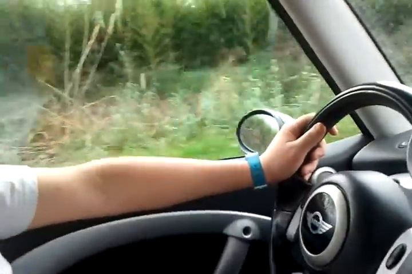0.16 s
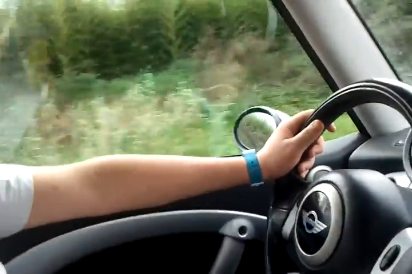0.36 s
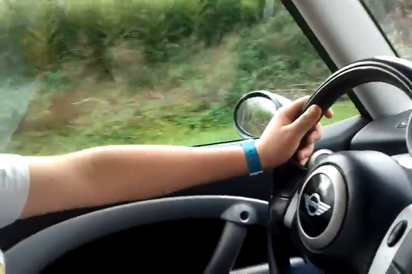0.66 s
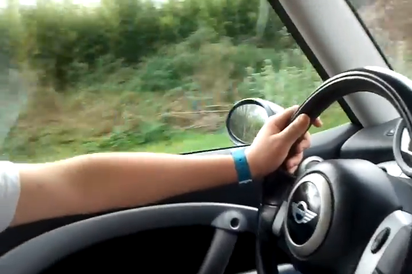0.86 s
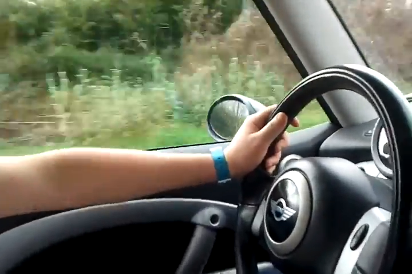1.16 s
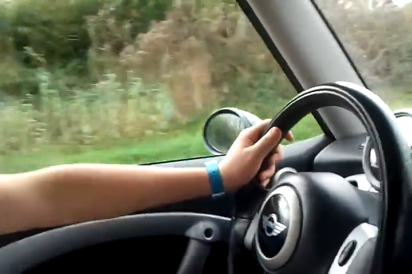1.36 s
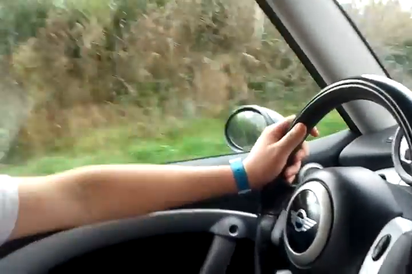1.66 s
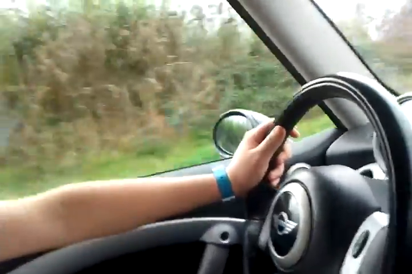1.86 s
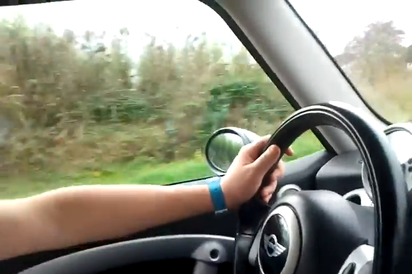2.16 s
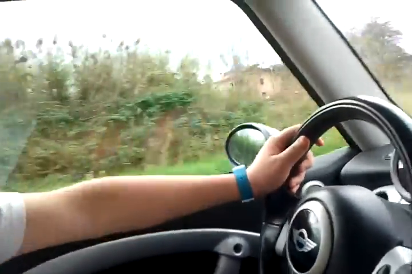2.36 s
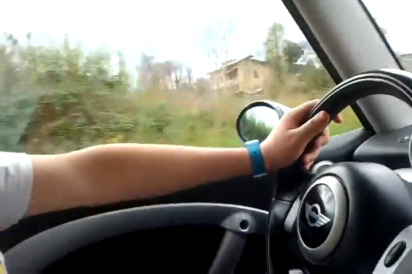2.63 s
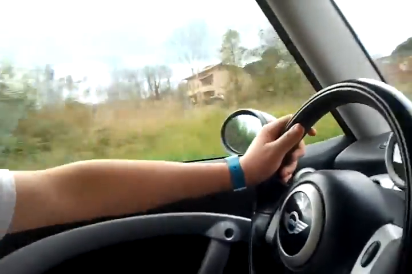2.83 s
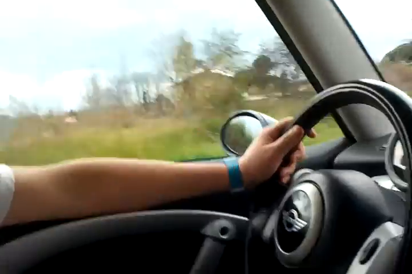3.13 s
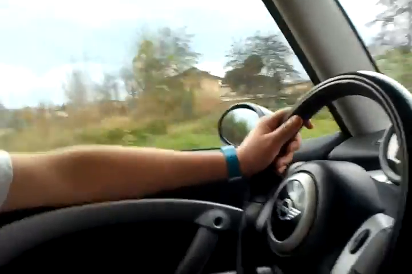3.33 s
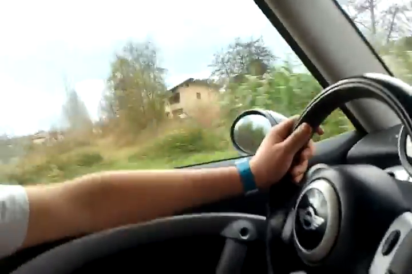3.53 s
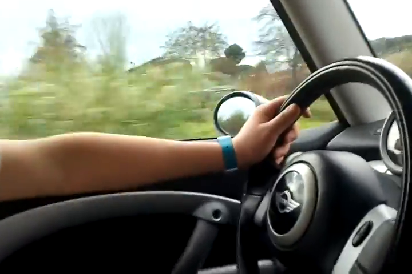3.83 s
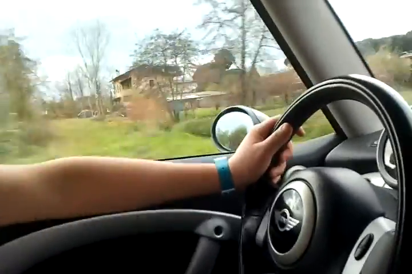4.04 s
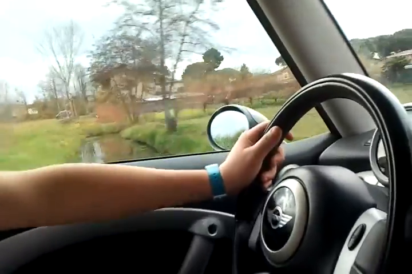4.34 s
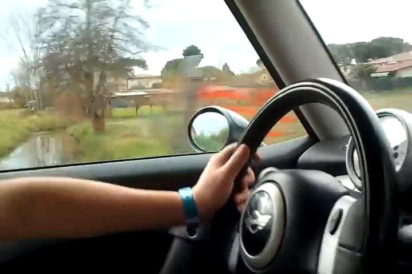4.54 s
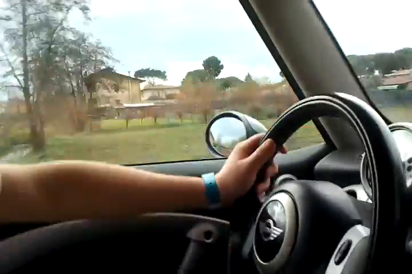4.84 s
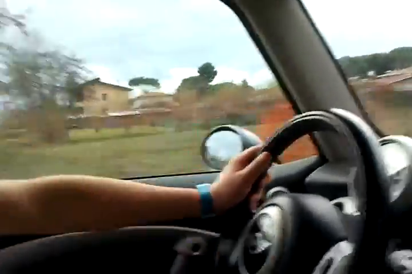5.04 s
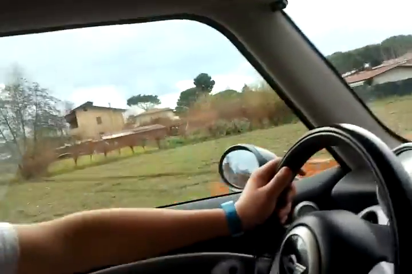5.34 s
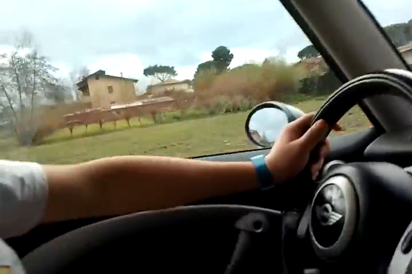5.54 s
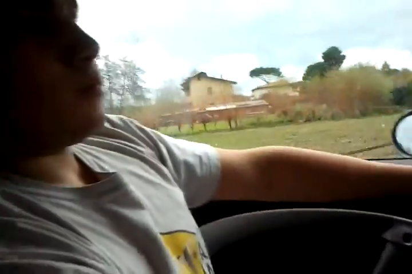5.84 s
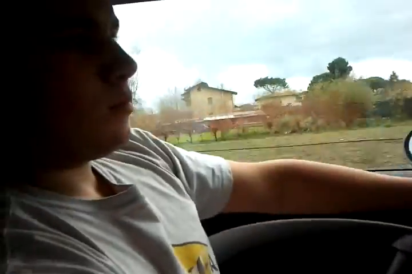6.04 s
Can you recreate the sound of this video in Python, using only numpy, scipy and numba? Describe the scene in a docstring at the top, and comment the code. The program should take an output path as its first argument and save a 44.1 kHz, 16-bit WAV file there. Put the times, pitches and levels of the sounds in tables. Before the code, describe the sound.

Inside a small car on a country lane, a deep, uneven road rumble runs throughout, with a low engine hum and tyre roar underneath. Bumps bring dull suspension thuds and short rattles, clicks and tiny squeaks from loose plastic trim. They cluster around two seconds and just after three, then hit hardest near five seconds, briefly overloading the hand-held phone microphone.

```python
"""A deep, lurching rumble inside a small car on a country lane, heard through a hand-held phone.
The road shakes the body, cabin air and panels; bumps set off low swings and suspension thuds.
A four-cylinder engine hums underneath, the tyres roar, and loose trim buzzes, knocks and squeaks
on the rough patches. Far back sit a faint drivetrain whine, wind and, near the end, a thin tone.
The phone overloads on the biggest bumps."""
import sys
import numpy as np
from scipy import signal
from scipy.io import wavfile
from scipy.ndimage import uniform_filter1d
from numba import njit

SR = 44100
rng = np.random.default_rng(int(sys.argv[2]) if len(sys.argv) > 2 else 0)


def transcribe(signal):
    """Save signal, clipped to [-1, 1], as a 16-bit WAV file at the path in sys.argv[1]."""
    frames = np.atleast_2d(signal).T
    limited = np.clip(frames, -1, 1)
    pcm = np.round(limited * 32767).astype(np.int16)
    wavfile.write(sys.argv[1], SR, pcm)


N = 272979

# Resonances of the body, cabin air and panels: pitch_hz, nominal_width_hz, relative_db
BODY_MODES = [(12.2, 9.9, -5.5), (21.39, 6.45, -2.5), (33.7, 20, -8)]
CABIN_MODES = [(56.56, 5.57, 0.94), (73.42, 7.8, -2.5)]
PANEL_MODES = [(97.5, 32.5, 5), (120.56, 29, 3), (164.4, 22, -18), (184.6, 14, -10.5), (221.9, 24, -8),
               (254.6, 6.8, -21.5)]
# Fader moves for the body boom and cabin drone: time_s, boom_db, drone_db
SHELL_LEVELS = [(0, -5, -25), (.35, -31.5, -18), (.66, -19.5, -25.5), (1.0, -9, -11), (1.2, -11, -16.5),
                (1.35, -14, -15.5), (1.47, -10, -9), (1.66, -16.5, -21.5), (1.91, -6.5, -22),
                (2.05, -10.5, -10.5), (2.3, -13.5, -19), (2.8, -28.5, -13.5), (3.03, -27.5, -19.5),
                (3.3, -13.5, -18.5), (3.5, -10, -7.5), (3.8, -19, -20), (4.16, -23.5, -11.5),
                (4.5, -17, -22.5), (4.75, -25, -6), (4.88, -12.5, -16.5), (5.13, -12.5, 1.5),
                (5.25, -11, -11), (5.5, -22.5, -17), (5.66, -9.5, -16), (5.9, -20.5, -19), (6.19, -10, -13)]
# Roughness of the tarmac, heard in the panels and trim: time_s, thrum_db, buzz_db
ROAD_LEVELS = [(0, -20.5, -50), (.45, -24.5, -58.5), (1.03, -16.5, -53.5), (1.16, -23, -53.5),
               (1.25, -13.5, -59.5), (1.36, -15.5, -54.5), (1.6, -16, -51.5), (1.78, -9, -44.5),
               (1.9, -13, -49.5), (2.03, -10, -44.5), (2.14, -24, -46.5), (2.21, -9.5, -50.5),
               (2.28, -23, -52), (2.4, -24.5, -52), (3.03, -18.5, -57.5), (3.28, -13.5, -49.5),
               (3.35, -20, -42.5), (3.41, -12.5, -51.5), (3.48, -17, -48), (3.72, -27, -56),
               (4.1, -22.5, -53), (4.53, -23.5, -62), (4.78, -10.5, -55), (4.94, -11, -37.5),
               (5.01, -4.5, -47), (5.07, -4, -64), (5.125, -1, -55), (5.17, -9, -61), (5.24, -13, -51),
               (5.32, -14, -65), (5.4, -22, -84), (6.05, -22, -81), (6.19, -28, -50)]
def road_rumble(t, road):
    """One road force makes the body boom, the cabin air drone and the panels thrum."""
    boom = undb(curve(t, SHELL_LEVELS)) * shaken(BODY_MODES, road, flicker_db=.72, per_s=4.15)
    drone = undb(curve(t, SHELL_LEVELS, 2)) * shaken(CABIN_MODES, road, flicker_db=.95, per_s=4.52)
    thrum = undb(curve(t, ROAD_LEVELS)) * shaken(PANEL_MODES, road, flicker_db=1.68, per_s=7.5)
    return boom + drone + thrum


# Low swings after bumps: start_s, peak_db, pitch_hz, swing_count
BUMP_SWINGS = [(1.568, 2, 20.6, 2.1), (1.682, -3, 22, 1.1), (1.781, 2, 28, 2.1), (1.860, -2, 24, 1.1),
               (1.983, -4, 60, 8), (3.300, -5, 14, 2.9), (3.497, -2, 24, 1.1), (5.007, 5, 21, 2.4),
               (5.099, 4, 44, 1.1), (5.151, 1, 45, 1.1), (5.192, 4, 20, 2.2), (5.290, -4, 20, 2.1)]
def bump_swings(t):
    """Bumps leave deep heaves, short shudders and one brief 60 Hz cabin ring; fast in, slower out."""
    out = 0
    for start, db, hz, swings in BUMP_SWINGS:
        progress = np.clip((t - start) * hz / swings, 0, 1)
        swell = np.abs(np.sin(np.pi * progress ** .65)) ** .6
        out += undb(db) * swell * np.sin(2 * np.pi * hz * (t - start))
    return out


# Suspension hits: start_s, level_db, pitch_hz, t60_s
FLOOR_THUDS = [(0.789, -14, 200, 0.091), (1.228, -13, 214, 0.096), (1.4, -22, 189, 0.092),
               (1.461, -17.5, 218, 0.09), (1.659, -21, 169, 0.11), (1.776, -13.5, 229, 0.11),
               (2.004, -8.5, 259, 0.066), (2.201, -12.5, 181, .06), (2.461, -8, 138, 0.11),
               (3.1, -8.5, 140, .1), (3.258, -14, 264, 0.044), (3.384, -16, 400, 0.037),
               (3.411, -13, 327, .05), (3.498, -25, 150, .08), (3.952, -14, 150, 0.1),
               (4.127, -10, 128, 0.14), (4.389, -11.5, 140, .08), (4.773, -15.5, 198, 0.097),
               (4.834, -17, 188, 0.068), (4.926, -14, 332, 0.14), (5.006, -1.5, 383, 0.022),
               (5.073, -10.5, 198, 0.073), (5.13, -8, 447, 0.07), (5.3194, -2.5, 282, 0.02),
               (5.7, -26, 148, 0.1)]
def suspension_thuds(t, attack_s=.00074):
    """The suspension rings the floor pan: a dull note with a hard attack and a short tail."""
    out = 0
    for start, db, hz, t60 in FLOOR_THUDS:
        age = np.maximum(t - start, 0)
        envelope = undb(db - 60 * age / t60) * (1 - np.exp(-age / attack_s))
        out -= envelope * np.sin(2 * np.pi * hz * age)
    return out


# Partials of the engine hum: firing_rate_multiple, relative_db
ENGINE_PARTIALS = [(.5, -0.5), (1, -3.5), (1.5, -6.5), (2, -12), (3, -21.5), (4, -29)]
# Engine fader: time_s, level_db
ENGINE_FADER = [(0, -18.5), (2, -16), (4.5, -23), (6.19, -25.5)]
def engine_hum(t, firing_hz=60.23, sag_hz_per_s=.4):
    """Firing orders of a smooth four, sinking slowly, each wavering with the mounts."""
    hz = (firing_hz - sag_hz_per_s * t) * (1 + .01079 * walk(6.5))
    phase = 2 * np.pi * np.cumsum(hz) / SR
    hum = sum(undb(db + .86 * walk(2.5)) * np.sin(order * phase + 2 * np.pi * rng.random())
              for order, db in ENGINE_PARTIALS)
    return undb(curve(t, ENGINE_FADER)) * unit(hum)


# Colour of the tyre roar: pitch_hz, nominal_width_hz, relative_db
TYRE_BANDS = [(347.3, 73, 4), (474, 263, 1), (583, 180, -2.5), (691, 160, -2), (794, 110, -7),
              (947, 110, -11), (1134, 216, -9.5), (1325, 630, -12.5), (1700, 10000, -47)]
# Broken patches of tarmac: middle_s, peak_db, half_length_s
ROUGH_PATCHES = [(1.007, -42, 0.11), (1.271, -40, 0.11), (1.476, -33, 0.071), (1.801, -31, 0.12),
                 (2.025, -28.5, 0.12), (2.208, -30.5, 0.023), (3.21, -32, 0.033), (3.404, -29.5, 0.059),
                 (3.483, -37.5, 0.091), (4.787, -45, 0.15), (4.974, -25, 0.083), (5.15, -22, 0.065),
                 (5.321, -31.5, 0.014)]
def tyre_roar(t, tread, smooth_road_db=-37):
    """The tread roars on smooth tarmac and swells over each broken patch."""
    swells = sum(undb(db) * np.exp(-((t - middle) / half) ** 2) for middle, db, half in ROUGH_PATCHES)
    level = np.hypot(undb(smooth_road_db), swells) * undb(.26 * walk(25.07))
    return level * shaken(TYRE_BANDS, tread, flicker_db=1.47, per_s=12, shift_samples=SR // 3)


# Air resonances in the tyres and floor: pitch_hz, nominal_width_hz, relative_db
CAVITY_MODES = [(242, 30, -0.5), (324.4, 45, -2)]
# Cavity fader: time_s, level_db
CAVITY_FADER = [(0, -35), (.7, -34), (1.3, -33.5), (2.3, -42), (2.9, -37.5), (3.7, -42.5), (4.5, -43),
                (5.5, -45), (6.19, -37.5)]
def cavity_ring(t, air):
    """Air in the tyres and floor rings with a hollow note."""
    return undb(curve(t, CAVITY_FADER)) * shaken(CAVITY_MODES, air, flicker_db=1.7, per_s=6.6)


# Trim rattles: start_s, level_db, centre_hz, nominal_width_ratio, length_s, thump_db
RATTLES = [(0.838, -47.5, 2270, 0.71, 0.017, -36), (0.997, -50.5, 1600, 1.2, 0.073, -32),
           (1.07, -46, 1400, 0.34, 0.01, -30), (1.081, -49, 2580, 0.56, 0.01, -31),
           (1.232, -57, 1290, 0.46, 0.0093, -25), (1.27, -54, 1290, 0.48, 0.011, -34),
           (1.522, -33.5, 2600, 0.74, 0.0087, -41), (1.537, -43, 2350, 1.5, 0.018, -33),
           (1.564, -50, 2500, 1.1, 0.014, -36), (1.644, -39, 1980, 1.3, 0.025, -31),
           (1.675, -50, 1940, 1.7, 0.044, -13.5), (1.745, -44.5, 2500, 1.8, 0.015, -34),
           (1.771, -42, 1870, 1.1, 0.016, -23), (1.813, -41, 2500, 0.84, 0.0064, -28),
           (1.849, -39, 2530, 1.4, 0.015, -35), (1.909, -39.5, 2480, 0.97, 0.044, -36),
           (1.982, -28, 1860, 2.2, 0.0089, -7.5), (2.191, -40.5, 1600, 1.7, 0.014, -17.5),
           (2.234, -46, 1500, 1.4, 0.011, -14.5), (2.392, -55, 4360, 0.28, 0.024, -39),
           (2.512, -65, 1630, 0.67, 0.017, -16.5), (3.123, -70, 1910, 0.92, 0.0098, -16),
           (3.181, -42, 3740, 0.74, 0.011, -14), (3.216, -45.5, 1550, 0.75, 0.037, -20),
           (3.303, -54, 3000, 0.76, 0.008, -43), (3.312, -43, 6000, 1.5, 0.002, -42),
           (3.3174, -38.5, 3760, 3.9, 0.0091, -25), (3.342, -32.5, 4300, 2, 0.004, -36),
           (3.345, -37.5, 4300, 1.1, 0.022, -58), (3.412, -48, 1950, 0.67, 0.0076, -13.5),
           (3.434, -54, 4000, 1.5, 0.005, -36), (3.448, -45, 2940, 0.81, 0.013, -20),
           (3.853, -42.5, 2400, 0.75, 0.018, -34), (3.8827, -33.5, 3300, 1.6, 0.018, -17),
           (3.987, -39, 4200, 1.6, 0.012, -29), (4.176, -44, 1640, 0.66, 0.011, -34),
           (4.675, -69, 1686, 1.5, 0.037, -15.5), (4.778, -53, 1370, 0.55, 0.045, -14),
           (4.821, -41, 2300, 1.8, 0.012, -50), (4.855, -46, 3000, 1.5, 0.008, -32),
           (4.876, -38, 1730, 1.6, 0.037, -27), (4.92, -44, 1650, 1.1, 0.053, -35),
           (4.9439, -21.5, 3500, 0.95, 0.0021, -19), (4.946, -26.5, 3130, 1.8, 0.015, -9),
           (4.978, -34, 2980, 2, 0.0035, -37), (4.989, -31.5, 2590, 2.4, 0.0092, -30),
           (5.005, -35.5, 1920, 1.7, 0.022, -23), (5.048, -38.5, 2500, 1.8, 0.016, -36),
           (5.114, -49, 3000, 2, 0.0034, -27), (5.12, -38, 1440, 1.2, 0.031, -12),
           (5.218, -46, 1800, 0.8, 0.014, -9), (5.239, -36, 4500, 1.4, 0.019, -32),
           (5.262, -56, 2010, 1.3, 0.008, -39), (5.279, -38, 3500, 2, 0.004, -30),
           (5.289, -38.5, 3500, 2.8, 0.0086, -15.5), (5.299, -33.5, 3220, 2, 0.011, -35),
           (5.319, -30, 2800, 0.49, 0.0046, -4), (5.383, -39.5, 1580, 1.06, 0.018, -30),
           (6.0885, -36.5, 2480, 1.3, 0.0096, -0.5), (6.096, -32, 3000, 2.8, 0.0081, -30)]
def trim_knocks(hollow_hz=1400, crack_hz=810, thump_floor_hz=22.8, sag_hz=161.5, sag_s=.005):
    """Each jolt makes a panel chatter against its clip for a moment, over a dull crack and thump."""
    age = np.arange(SR // 8) / SR
    out = np.zeros(N + len(age))
    bounces = np.pad(undb(1.5 * walk(350)), (0, len(age)), mode="reflect")  # uneven rebounds
    # The thump pushes inward first and sags in pitch as the panel relaxes.
    cycles = thump_floor_hz * age + sag_hz * sag_s * (1 - np.exp(-age / sag_s))
    thump = -np.sin(2 * np.pi * cycles) * undb(-60 * age / .1)  # 60 dB down in 0.1 s
    attack = np.minimum(age / .0005, 1)
    first_contact = 1 + undb(-2) * np.exp(-age / .0014)
    tail = .06 * np.exp(-age / .03)
    for start, db, hz, width_ratio, length, thump_db in RATTLES:
        grit = rng.standard_normal(len(age))
        span = slice(int(start * SR), int(start * SR) + len(age))
        hold = np.exp(-(age / length) ** 4)
        envelope = attack * (hold + tail) * first_contact * bounces[span]
        ring = unit(resonance(grit, hz, width_ratio * hz) + .16 * grit)
        hollow = undb(-4) * unit(resonance(grit, hollow_hz, .79 * hollow_hz))  # space behind the trim
        crack = undb(-23.5) * unit(bandpass(grit, crack_hz, .32 * crack_hz))
        out[span] += undb(db) * envelope * (ring + hollow) + undb(thump_db) * (envelope * crack + thump)
    return out[:N]


# Colour of the trim buzz: pitch_hz, nominal_width_hz, relative_db
BUZZ_BANDS = [(1410, 810, 0.5), (2370, 3330, 17.5), (4650, 13000, -4.5), (6800, 7400, 0)]
def trim_buzz(t, grit, hits_per_s=240, spread_db=2.1, t60_s=.036):
    """Many tiny trim contacts, a few much harder than the rest, blur into a buzz on rough tarmac."""
    hits = (rng.random(N) < hits_per_s / SR) * undb(spread_db * rng.exponential(size=N))
    decay = np.exp(-np.log(1000) / (t60_s * SR))
    chatter = 1 + unit(signal.lfilter([1], [1, -decay], hits))
    return undb(curve(t, ROAD_LEVELS, 2)) * shaken(BUZZ_BANDS, grit * chatter, flicker_db=.94, per_s=34)


# Plastic chirps: start_s, peak_db, pitch_hz, length_s
CHIRPS = [(0.835, -41, 3400, 0.0061), (1.515, -41, 3400, 0.0092), (2.362, -43.5, 3600, 0.019),
          (2.373, -44, 3050, .017), (2.374, -46, 2230, 0.012), (2.39, -47, 2370, 0.022),
          (3.178, -34, 5160, 0.0052)]
def trim_squeaks(t):
    """Rubbing plastic gives brief pure tones that swell and fade."""
    out = 0
    for start, db, hz, length in CHIRPS:
        swell = np.sin(np.pi * np.clip((t - start) / length, 0, 1))
        out += undb(db) * swell * np.sin(2 * np.pi * hz * t)
    return out


# Drivetrain resonance: pitch_hz, nominal_width_hz, relative_db
WHINE_BAND = [(747, 14, 0)]
# Whine fader: time_s, level_db
WHINE_FADER = [(0, -54), (.4, -46.5), (1.4, -49), (2.5, -47.5), (3.8, -53), (4.8, -54.5), (6.19, -45)]
def drivetrain_whine(t, air):
    """The drivetrain sings faintly in one narrow band of noise."""
    return undb(curve(t, WHINE_FADER)) * shaken(WHINE_BAND, air, flicker_db=1.3, per_s=3.3)


# Glide of the thin tone: time_s, pitch_hz, level_db
TONE_GLIDE = [(5.4, 940, -76), (5.5, 943, -50), (5.85, 920, -53), (6.05, 910, -56), (6.15, 895, -74)]
def thin_tone(t):
    """A faint, fluttering sine comes up near the end, sinks and fades."""
    phase = 2 * np.pi * np.cumsum(curve(t, TONE_GLIDE)) / SR
    return undb(curve(t, TONE_GLIDE, 2) + 4.2 * walk(16)) * np.sin(phase)


def wind(air, level_db=-59):
    """Passing air lays a soft, broad hiss behind everything."""
    return undb(level_db) * unit(bandpass(air, hz=2300, width_hz=15000))


def undb(db):
    """Decibels to gain."""
    return 10 ** (np.asarray(db) / 20)


def unit(x):
    """Scale to rms 1."""
    return x / np.sqrt(np.mean(x ** 2))


def curve(t, table, column=1):
    """Follow one column of a table in straight lines; column 0 holds the times."""
    columns = np.transpose(table)
    return np.interp(t, columns[0], columns[column])


def walk(per_s):
    """Random levels, per_s a second, smoothed twice; spread near 1."""
    hold = int(SR / per_s)
    steps = np.repeat(rng.standard_normal(N // hold + 1), hold)
    return 1.295 * uniform_filter1d(uniform_filter1d(steps, hold), hold)[:N]


@njit
def bandpass(x, hz, width_hz):
    """State-variable band-pass, gain 1 at the centre."""
    out, band_state, low_state = np.empty(len(x)), 0., 0.
    tuning, damping = np.tan(np.pi * hz / SR), width_hz / hz
    for i in range(len(x)):
        band = (band_state + tuning * (x[i] - low_state)) / (1 + tuning * (tuning + damping))
        band_state = 2 * band - band_state
        low_state += 2 * tuning * band
        out[i] = damping * band
    return out


def resonance(x, hz, nominal_width_hz):
    """Two slightly widened band-passes in series make a peak with steep flanks."""
    width_hz = 1.18 * nominal_width_hz
    return bandpass(bandpass(x, hz, width_hz), hz, width_hz)


def shaken(modes, force, flicker_db, per_s, shift_samples=0):
    """A force rings flickering resonances, at rms 1 in all; a shift gives each unrelated pushes."""
    out = 0
    for i, (hz, width, db) in enumerate(modes):
        push = np.roll(force, i * shift_samples)
        out += undb(db + flicker_db * walk(per_s)) * resonance(push, hz, width)
    return unit(out)


def scene():
    """Everything that reaches the phone in the cabin, in mono."""
    t = np.arange(N) / SR
    engine = engine_hum(t)
    road, tread, grit, air = rng.standard_normal((4, N))
    body = road_rumble(t, road) + bump_swings(t) + suspension_thuds(t)
    tyres = tyre_roar(t, tread) + cavity_ring(t, air)
    trim = trim_buzz(t, grit) + trim_knocks() + trim_squeaks(t)
    background = drivetrain_whine(t, air) + thin_tone(t) + wind(air)
    return (body + engine + tyres + trim + background)[None]


def record(dry, mic_stop_hz=9064.64, ceiling=.707, knee=60, smooth_hz=9936.24, top_hz=19000):
    """The microphone rolls off, the converter clips on the bumps and a filter dulls the edges."""
    mic = signal.sosfilt(signal.cheby2(10, 50, mic_stop_hz, fs=SR, output="sos"), dry)
    clipped = mic / (1 + np.abs(mic / ceiling) ** knee) ** (1 / knee)
    dulled = signal.sosfiltfilt(signal.butter(6, smooth_hz, fs=SR, output="sos"), clipped)
    edge_leak = undb(-4.5) * (clipped - dulled)  # treble that gets past the smoothing
    hiss = undb(-101) * rng.standard_normal(dry.shape)
    return signal.sosfilt(signal.butter(8, top_hz, fs=SR, output="sos"), dulled + edge_leak + hiss)


dry = scene()
out = record(dry)
transcribe(out)
```